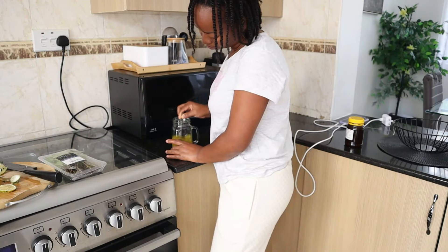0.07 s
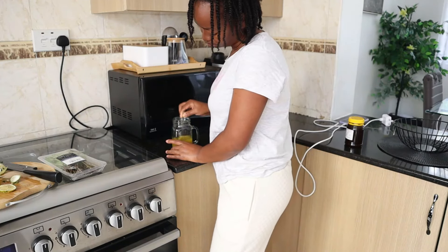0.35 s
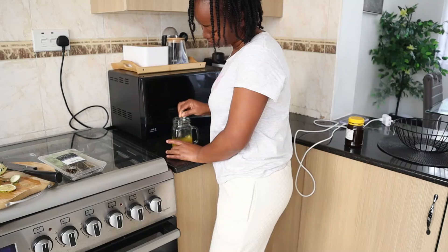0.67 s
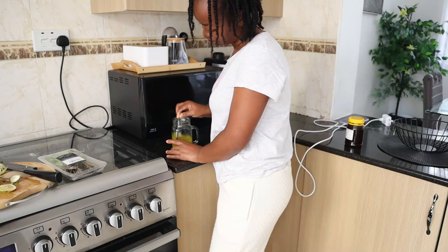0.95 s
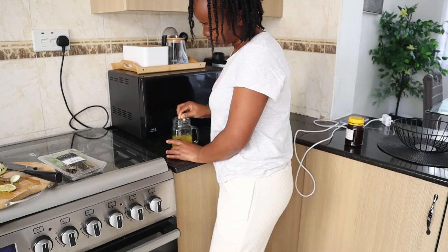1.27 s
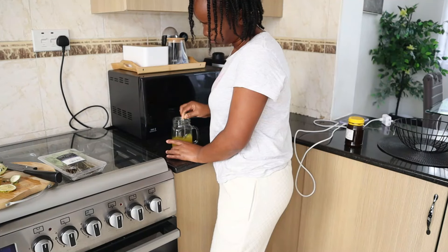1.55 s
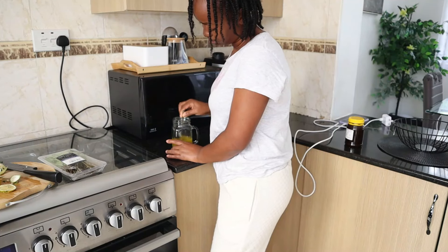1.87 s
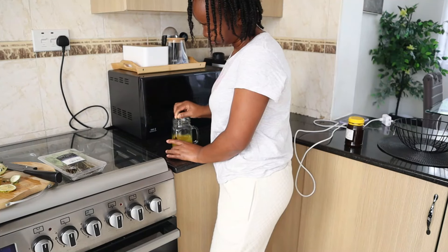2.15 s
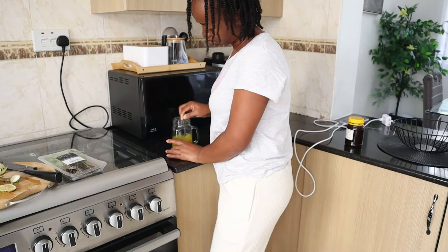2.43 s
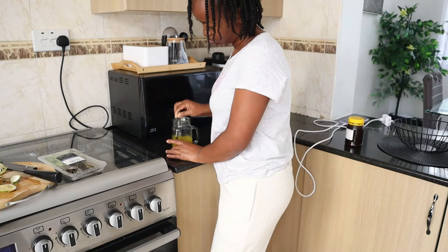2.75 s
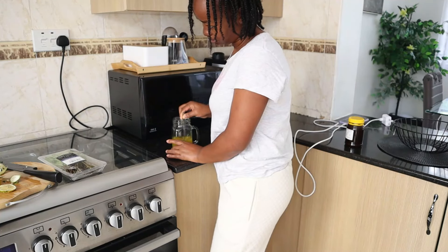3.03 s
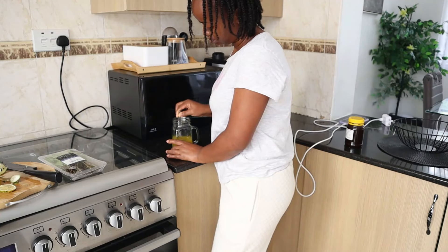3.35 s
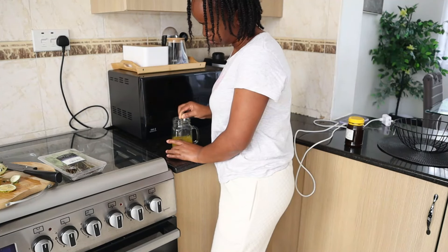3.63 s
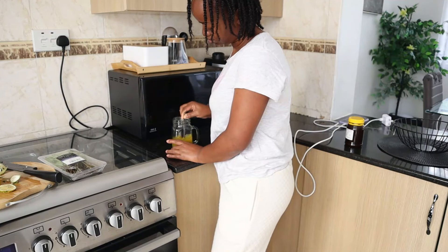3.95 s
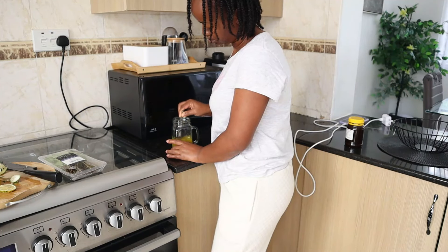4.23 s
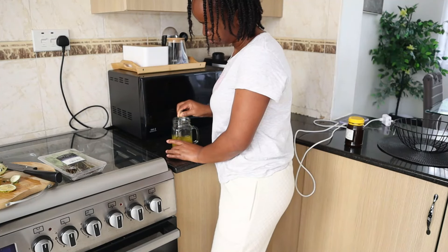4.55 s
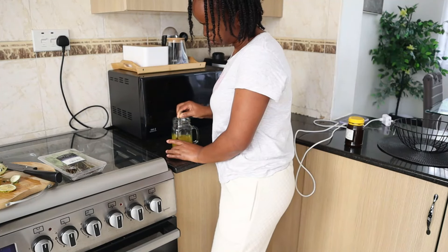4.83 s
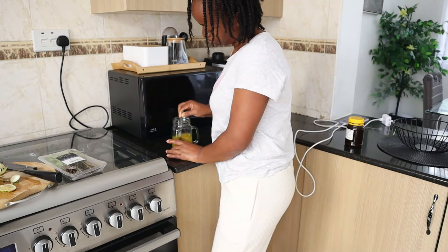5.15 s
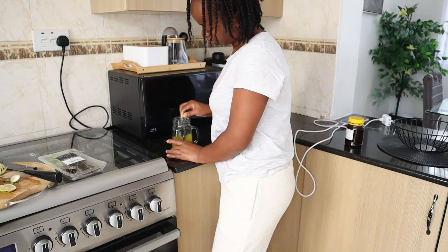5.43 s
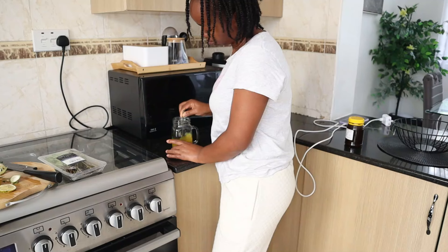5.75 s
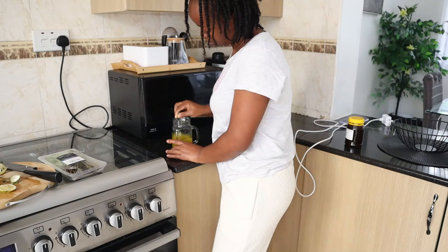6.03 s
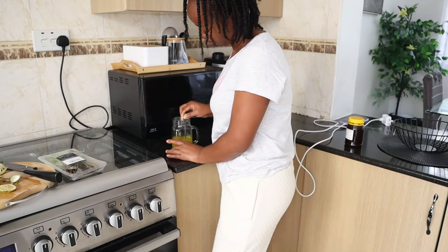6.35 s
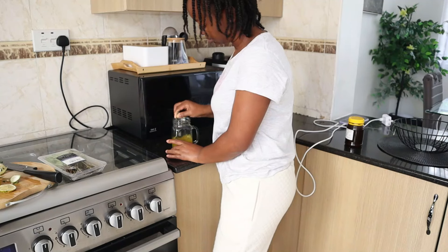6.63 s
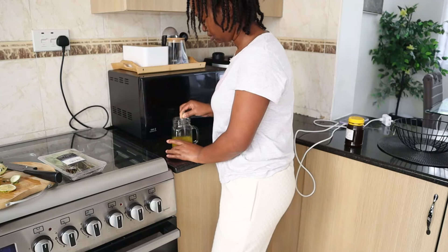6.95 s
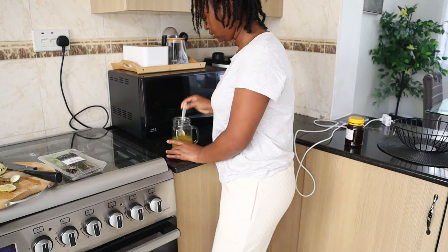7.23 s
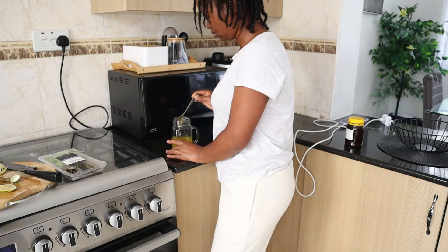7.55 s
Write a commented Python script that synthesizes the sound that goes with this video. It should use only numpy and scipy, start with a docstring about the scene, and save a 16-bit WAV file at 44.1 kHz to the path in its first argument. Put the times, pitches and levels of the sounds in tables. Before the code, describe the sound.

A steel teaspoon stirs a drink in a glass jar, heard from nearby in a slightly echoing kitchen. A soft liquid wash and a faint appliance hum run underneath. It opens with a hollow plop and a few clinks, then light scrapes and glancing touches, with more plops near 1.7 seconds. From about 2 to 3.5 seconds the spoon clinks quickly and unevenly, each bright, short ring carrying a small thud. A quieter stretch of rubbing and occasional light ticks follows, with dull knocks and plops at about 4.1 and 5.7 seconds. Stronger clinks return from 6.1 to 7.1 seconds, mixed with plops. At about 7.4 seconds the spoon taps the rim once with a clean, longer ring, and the liquid settles.

```python
"""A tiled kitchen: a steel teaspoon stirs a drink in a glass jar held on a stone counter.
The spoon clinks, rubs and glances along the glass, ringing modes damped by the drink and the hand.
The liquid washes round and plops, sounding the jar's hollow, and a few dull knocks come from the base.
At the end the spoon is lifted out and taps the rim. An appliance hums faintly throughout."""
import sys
import numpy as np
from scipy import signal
from scipy.fft import rfft, irfft, next_fast_len
from scipy.io import wavfile
from scipy.ndimage import map_coordinates

SR = 44100
rng = np.random.default_rng(int(sys.argv[2]) if len(sys.argv) > 2 else 0)


def transcribe(signal):
    """Save signal, clipped to [-1, 1], as a 16-bit WAV file at the path in sys.argv[1]."""
    frames = np.atleast_2d(signal).T
    limited = np.clip(frames, -1, 1)
    pcm = np.round(limited * 32767).astype(np.int16)
    wavfile.write(sys.argv[1], SR, pcm)


N = 343539

# modes of jar and spoon, damped by drink and hand: pitch_hz, level_db, base_t60_s
GLASS_MODES = [(2682, 8.5, 0.094), (2722, 9, 0.049), (2910, 8, 0.044), (3800, 4, 0.11), (4076, 12.5, 0.091),
               (3950, 11.5, 0.027), (4380, 13, 0.063), (4500, 9, 0.023), (5440, 2, 0.053), (6083, 8, 0.041),
               (6430, 5.5, 0.037), (7540, -9, 0.084), (8160, 2.5, 0.055), (8980, -19, 0.043),
               (10720, -0.5, 0.069), (12100, -10, 0.053), (11150, -23, 0.087)]


def amp(db):
    """Decibels to gain."""
    return 10 ** (np.asarray(db) / 20)


def unit(x):
    """x at rms 1."""
    return x / np.sqrt(np.mean(x ** 2) + 1e-20)


def along(points, hz):
    """Read a curve of (Hz, value) points on a log frequency axis."""
    freqs, values = np.transpose(points)
    return np.interp(np.log(hz + 1), np.log(freqs + 1), values)


def filtered(x, response):
    """EQ x with a gain given as a function of frequency."""
    n = x.shape[-1]
    padded = next_fast_len(n + 8192)
    return irfft(rfft(x, padded) * response(np.fft.rfftfreq(padded, 1 / SR)), padded)[..., :n]


def coloured(x, spectrum):
    """x shaped by (Hz, dB) points, at rms 1."""
    return unit(filtered(x, lambda hz: amp(along(spectrum, hz))))


def band(x, edges_hz):
    """Causal band-pass."""
    return signal.sosfilt(signal.butter(4, edges_hz, "bandpass", fs=SR, output="sos"), x)


def wobble(rate):
    """A smooth random curve, rate knots a second."""
    knots = rng.standard_normal(int(N * rate / SR) + 4)
    return map_coordinates(knots, [np.arange(N) * rate / SR])


def at_level(x, db, window_s):
    """A stereo event scaled so that the opening of its mono mix has this rms level."""
    opening = x.mean(0)[:round(SR * window_s)]
    return x * amp(db) / np.sqrt(np.mean(opening ** 2) + 1e-20)


def add(track, start_s, x):
    """Mix x into the track at start_s."""
    part = track[:, max(round(start_s * SR), 0):][:, :x.shape[1]]
    part += x[:, :part.shape[1]]


def event_time():
    """The time axis of one event, 0.55 s long."""
    return np.arange(SR * 11 // 20) / SR


def tone(hz, t60, attack_s=0.00052):
    """One damped note."""
    t = event_time()
    return np.sin(2 * np.pi * hz * t) * amp(-60 * t / t60) * (1 - np.exp(-t / attack_s))


def ringing(modes, sustain, scatter_db=4.5, detune=0.29):
    """Modes at new strengths for every blow, decays scaled by sustain; grip detunes the damped most."""
    t = event_time()
    hz, db, t60 = np.transpose(modes)[:, :, None]
    strength_db = db + scatter_db * rng.standard_normal(hz.shape)
    pitch_hz = hz + detune * rng.standard_normal(hz.shape) / t60 ** 1.5
    envelopes = amp(strength_db - 60 * t / (t60 * max(sustain, 0.2)))
    return np.sum(envelopes * np.sin(2 * np.pi * pitch_hz * t), 0)


def diffuse(n):
    """Stereo noise arriving from all sides: narrow in the bass, wide in the treble."""
    # stereo width: freq_hz, side_over_mid_db
    width = [(60, -18), (125, -15.5), (250, -2.5), (700, -5), (1300, -0.5), (2500, 4.5), (12000, 4)]
    mid, side = rng.standard_normal((2, n))
    side = filtered(side, lambda hz: amp(along(width, hz)))
    return np.array([mid + side, mid - side])


def kitchen(x, direct_db, near_db=-1, near_t60=0.058):
    """Direct sound, quick echoes off tiles and counter, then the room's tail."""
    # reverb time: freq_hz, t60_s
    room_decay = [(100, 1), (260, 0.49), (700, 0.57), (1800, 0.48), (4800, 0.49), (8000, 0.38),
                  (13000, 0.22)]
    t = event_time()
    noise = diffuse(len(t))
    hz, frame_s, spectra = signal.stft(noise, SR, nperseg=256)
    decay = amp(-60 * frame_s / along(room_decay, hz)[:, None])
    tail = signal.istft(spectra * decay, SR, nperseg=256)[1][:, :len(t)]
    tail *= 1 - np.exp(-t / 0.0048)
    near = noise[:, ::-1] * amp(-60 * t / near_t60)
    paths = (unit(tail) + amp(near_db) * unit(near)) / np.sqrt(len(t))
    paths[[0, 1], [0, 3]] += amp(direct_db)  # the right side arrives 3 samples late
    return signal.fftconvolve(x[None], paths, axes=1)[:, :len(t)]


def room_tone():
    """Still room air and an appliance's slightly unsteady hum."""
    # the appliance's note: pitch_hz, relative_db
    hum_notes = [(70.0, -50)]
    # colour of the air: freq_hz, gain_db
    air_eq = [(12, -13), (20, -10.5), (135, -0.5), (587, -9.5), (693, -10.5), (914, -12), (1640, -10.5),
              (2160, -18), (2620, -13.5), (3860, -21.5), (5380, -24.5), (11100, -38.5), (15000, -62)]
    t = np.arange(N) / SR
    hum = np.zeros(N)
    for hz, db in hum_notes:
        gain = np.sqrt(2) * amp(db - 9.5 + 1.1 * wobble(3))
        hum += gain * np.sin(2 * np.pi * hz * t + 0.5 * wobble(9))
    return hum + amp(-46) * coloured(diffuse(N), air_eq)


def swirl(wash_db=-53, lifted_s=7.3, settle_db_per_s=25):
    """The stirred drink washes round the jar, gently swelling, and settles once the spoon is lifted."""
    # colour of the wash: freq_hz, gain_db
    liquid_eq = [(250, -27), (420, -35), (700, 20.5), (900, -7), (1200, -10), (1650, 12), (2100, -61),
                 (2600, -16), (3200, -8), (3900, 5), (5500, -8.5), (9000, -13.5), (15000, -13.5)]
    wash = coloured(diffuse(N) * amp(1.1 * wobble(110)), liquid_eq)
    settling_db = settle_db_per_s * np.maximum(np.arange(N) / SR - lifted_s, 0)
    return wash * amp(wash_db - settling_db + 0.33 * wobble(4))


def wall_ring(blow, db, open_db, edge_db):
    """The wall rings into the room: an open wall gives more tone, a sharp edge more sparkle."""
    # low ring, high ring, sparkle and fizz: low_hz, high_hz
    registers = [(2200, 3300), (3400, 5200), (5200, 7500), (7500, 15000)]
    balance_db = open_db - 1.5, -3.7, edge_db - 5.5, edge_db - 5.5
    wet = kitchen(blow, direct_db=-53, near_db=2.5, near_t60=0.094)
    return sum(at_level(band(wet, edges), db + trim_db, window_s=0.027)
               for edges, trim_db in zip(registers, balance_db))


def singing(db, sustain):
    """A few modes sing on after a clean tap, louder when the grip is loose."""
    # lingering modes: pitch_hz, level_db, base_t60_s
    long_modes = [(1000, -16, 0.84), (2785, -10, 0.5), (3122, -3.5, 0.46), (3770, -12, 0.23),
                  (3920, -20, 0.2)]
    song = ringing(long_modes, sustain, scatter_db=-2.5, detune=0.96)
    return at_level(kitchen(song, direct_db=-20), db, window_s=0.076)


def jar_thud(db, skid, t60=0.015, hollow_hz=696):
    """Jar and counter thud, mostly by way of the room, and the air above the drink rings after them."""
    # body of jar and counter: freq_hz, gain_db
    thud_eq = [(60, -38), (130, 9), (195, -17.5), (260, -6.5), (400, -3.5), (445, 2.5), (520, -6.5),
               (900, -7.5), (1020, 0.5), (1170, 2.5), (1330, 2), (1490, -0.5), (1640, -3.5), (1900, -4),
               (2030, -13), (3000, -33)]
    t = event_time()
    thud = coloured(rng.standard_normal(len(t)), thud_eq) * (amp(-60 * t / t60) + skid)
    thud = kitchen(band(thud, (105, 2200)), direct_db=-10, near_db=-4, near_t60=0.39)
    hollow = kitchen(tone(hollow_hz, t60=0.11), direct_db=-8.5)
    return at_level(thud, db, window_s=0.077) + at_level(hollow, db - 9.5, window_s=0.11)


def dry_attack(x, peak_db, t60, edges_hz):
    """The front of a clink arrives straight from the jar, on the left first."""
    attack = band(x * amp(-60 * event_time() / t60), edges_hz)
    return amp(peak_db) * np.array([attack, np.roll(attack, 4)]) / np.abs(attack).max()


def clinks(crack_t60=0.026, skid_t60=0.16, clatter_db=1, clatter_t60=0.015):
    """Steel strikes glass: a brief blow and a short skid set jar and spoon ringing."""
    # spoon hits (open: how freely the wall rings; edge: how sharp the contact; low, high: spoon notes):
    # start_s, level_db, open_db, edge_db, low_hz, low_db, high_hz, high_db, thud_db, singing_db
    hits = [(0.003,-36,0.5,-13,2760,-42,4330,-38.5,-35.5,-42.5),
            (0.194,-28,-6.5,-4.5,2770,-46,3670,-36.5,-32,-58),
            (0.278,-44.5,1.5,-2,2700,-60,3870,-59,-43,-56), (1.363,-53,-3,3,2640,-62,4200,-57,-62,-72),
            (1.962,-36,-6.5,-10,2765,-41,4050,-47,-36,-68),
            (2.123,-36.5,-8,-11.5,2790,-50,4032,-45,-41.5,-54),
            (2.152,-28,-7.5,-8,2750,-51,4270,-45,-33,-54), (2.193,-34.5,-1,-0.5,2885,-46,4030,-46,-40,-40),
            (2.291,-36,1.5,-5,2720,-42,3650,-40,-36,-41),
            (2.302,-26.5,-3.5,-5.5,2744,-28.5,4053,-38,-30.5,-50),
            (2.408,-25.5,-2.5,-4,2450,-33,3480,-33,-27,-37.5),
            (2.699,-26,1.5,-7,2665,-34,4050,-33,-36.5,-43),
            (2.862,-36.5,-3.5,-5,2660,-36.5,3775,-36.5,-41,-47),
            (2.956,-28.5,-15,-9,2706,-41,3845,-34,-30.5,-41.5),
            (3.08,-27,-12,-8.5,2970,-37,4000,-37,-28.5,-30.5),
            (3.2,-30,-17,-9.5,2810,-35.5,3900,-42,-33.5,-39),
            (3.282,-30,0.5,0,2730,-43.5,3970,-42,-43,-37.5), (3.458,-40,-6,-6,2700,-48,3990,-41.5,-44,-58),
            (3.547,-29.5,-12,-1.5,2990,-45,4435,-34.5,-31.5,-35),
            (6.136,-22,-3,-7.5,2687,-22,3650,-32,-34,-55), (6.277,-29,-3,-8,2480,-36,4470,-45,-31.5,-44),
            (6.534,-34.5,1,-8,2720,-36,3960,-40,-39.5,-51), (6.549,-34.5,3,-7,2516,-29,4450,-46,-38,-52),
            (6.618,-29.5,-2,0.5,2734,-32,3920,-44,-41,-37.5),
            (6.871,-37.5,-1,5,3775,-30,3995,-32,-35.5,-47.5),
            (7.074,-24.5,-5,-3.5,2530,-30.5,3760,-33,-27.5,-37),
            (7.085,-28.5,-3,-16,2630,-40,3924,-19,-32,-27)]
    # colour of the contact noise: freq_hz, gain_db
    crack_eq = [(1500, -60), (2300, -19), (3200, -36), (4500, -16), (5500, -30), (8500, -6), (9800, -32),
                (12300, -11), (16000, -46)]
    # ranges of the brief notes that change with the point of contact: low_hz, high_hz
    clatter_ranges = [(2400, 3000), (3600, 4200), (3900, 4700), (5900, 9300)]
    out, t = np.zeros((2, N)), event_time()
    skid = amp(-11.5 - 60 * t / skid_t60)
    for start_s, db, open_db, edge_db, low_hz, low_db, high_hz, high_db, thud_db, singing_db in hits:
        sustain = 0.84 + 0.14 * open_db  # an open wall rings longer
        crack = coloured(rng.standard_normal(len(t)), crack_eq) * (amp(-60 * t / crack_t60) + skid)
        crack *= amp(-4.5 - 0.59 * open_db)  # and grates less
        clatter = [(hz, clatter_db, clatter_t60)
                   for edges in clatter_ranges for hz in rng.uniform(*edges, 3)]
        blow = ringing(GLASS_MODES + clatter, sustain) + crack
        clink = wall_ring(blow, db, open_db, edge_db)
        for hz, note_db in (low_hz, low_db), (high_hz, high_db):
            spoon_note = kitchen(tone(hz, t60=0.099), direct_db=2)
            clink += at_level(spoon_note, note_db, window_s=0.055)
        clink += singing(singing_db, sustain)
        clink += jar_thud(thud_db, skid)
        tick = dry_attack(crack, db + edge_db + 7.5, t60=0.017, edges_hz=(4500, 12500))
        strike = dry_attack(blow, db + open_db - 7, t60=0.054, edges_hz=(2300, 9000))
        add(out, start_s, clink + tick + strike)
    return out


def plops(glide=0.034, glide_s=0.013, wander=0.035, wander_hz=70, t60=0.15, attack_s=0.0019):
    """A gulp rings the air above the drink; the note wavers as the liquid churns, sinks as it falls."""
    # gulps: start_s, level_db, pitch_hz, churn_s
    gulps = [(0.015, -30, 742.5, 0.026), (1.671, -29.5, 738.5, 0.021), (1.757, -28.5, 729.5, 0.025),
             (1.838, -48, 714, 0.0082), (2.436, -23.5, 689, 0.0033), (2.448, -19, 675.3, 0.0018),
             (2.464, -23, 678, 0.0018), (4.098, -17.5, 690, 0.017), (4.815, -34.5, 696, 0.01),
             (4.968, -45, 1112, .004), (5.761, -24, 722.5, 0.016), (6.143, -25.5, 705, 0.048),
             (6.212, -25, 732, 0.035), (6.549, -36, 693, 0.015), (6.873, -37.5, 687, 0.024),
             (7.079, -22, 724, .025)]
    out, t = np.zeros((2, N)), event_time()
    for start_s, db, hz, churn_s in gulps:
        waver = unit(filtered(rng.standard_normal(len(t)), lambda f: f < wander_hz))
        bend = 0.988 + glide * np.exp(-t / glide_s) + wander * waver
        phase = 2 * np.pi * np.cumsum(hz * bend) / SR
        envelope = (1 - np.exp(-t / attack_s)) * amp(-60 * np.maximum(t - churn_s, 0) / t60)
        slosh = amp(-19) * unit(band(rng.standard_normal(len(t)), (640, 960)))
        wet = kitchen((np.sin(phase) + slosh) * envelope, direct_db=1, near_db=-3, near_t60=0.12)
        add(out, start_s - 0.002, at_level(wet, db, window_s=0.071))
    return out * amp([[1], [-1]])  # a little to the left


def knocks(t60=0.076, attack_s=0.0085):
    """Blunt blows on the base, damped by the hand and the counter."""
    # blows: start_s, relative_db
    blows = [(0.027, -34), (4.0939, -17), (5.711, -27), (5.7454, -11.5), (5.7614, -18.5), (5.7767, -31)]
    # body of the base: freq_hz, gain_db
    base_eq = [(80, -8), (130, -26), (280, -13.5), (420, -1.5), (550, -11.5), (720, 0.5), (950, -7),
               (1500, -4.5), (1900, -11), (2400, -17), (3200, -28.5), (6000, -36)]
    out, t = np.zeros((2, N)), event_time()
    envelope = amp(-60 * t / t60) * (1 - np.exp(-t / attack_s))
    for start_s, db in blows:
        thud = coloured(rng.standard_normal(len(t)), base_eq) * envelope
        wet = band(kitchen(thud, direct_db=-5.5), (80, 6000))
        add(out, start_s, at_level(wet, db - 9.5, window_s=0.097))
    return out


def rubbed_wall(slips, pitch_spread=0.024, scatter_db=4.7, grit_db=-28):
    """Slips excite the wall's resonances, which differ at each point of contact."""
    # wall resonances: centre_hz, width_hz, level_db
    resonances = [(1160,46,10), (1633,223,11.5), (2632,65,22), (3797,130,22), (4594,75,18.5), (6740,330,1),
                  (8070,180,7.5)]
    modes = [(hz * (1 + pitch_spread * rng.normal()), width, amp(db + scatter_db * rng.normal()))
             for hz, width, db in resonances]
    return filtered(slips, lambda f: amp(grit_db) + sum(
        gain * 1j * f * width / (hz * hz - f * f + 1j * f * width) for hz, width, gain in modes))


def rubs(slips_per_s=900, slip_spread_db=5):
    """The spoon drags along the glass in tiny, uneven slips that swell and fade."""
    # strokes: start_s, length_s, low_db, mid_db, hiss_db
    strokes = [(0.411,0.069,-50.5,-48.5,-53), (0.518,0.045,-45,-54,-54.5), (0.591,0.035,-49,-52,-56),
               (0.787,0.076,-47.5,-46.5,-51), (1.015,0.057,-51,-62,-71), (1.153,0.17,-53,-56.5,-56),
               (1.369,0.042,-62,-56,-56), (1.565,0.074,-51,-49,-49.5), (1.831,0.041,-55,-49,-65),
               (2.623,0.023,-42,-40,-50), (3.733,0.11,-54.5,-53.5,-52.5), (3.96,0.036,-50,-49,-53),
               (3.992,0.055,-42.5,-60,-45.5), (4.337,0.028,-47,-53,-58.5), (4.521,0.082,-51.5,-56,-52.5),
               (4.714,0.089,-48.5,-51,-54.5), (5.082,0.099,-53.5,-56,-60.5), (5.252,0.017,-46,-45.5,-48.5),
               (5.603,0.044,-48,-48.5,-45.5), (6.025,0.075,-55,-50,-56), (7.313,0.04,-62,-45,-52.5)]
    out, t = np.zeros((2, N)), event_time()
    for start_s, length_s, *levels_db in strokes:
        progress = np.minimum(t / length_s, 1)
        swell = np.sin(np.pi * progress ** 0.54)
        slips = swell * (rng.random(len(t)) < slips_per_s / SR) * rng.standard_normal(len(t))
        slips *= amp(slip_spread_db * rng.standard_normal(len(t)))
        # crossfade from one point of contact to the next
        rub = rubbed_wall(slips * (1 - progress)) + rubbed_wall(slips * progress)
        wet = kitchen(rub, direct_db=-7.5)
        for edges, db in zip([(600, 1860), (2000, 3180), (3200, 11600)], levels_db):
            add(out, start_s, at_level(band(wet, edges), db, window_s=length_s + 0.028))
    return out


def touches(t60=0.064, wall_db=-11):
    """A glancing touch under the liquid gives one short note and barely stirs the rest of the glass."""
    # glancing contacts: start_s, level_db, pitch_hz
    glances = [(0.446, -41.5, 2480), (0.598, -46.5, 3680), (0.779, -47, 2636), (0.992, -50, 3810),
               (1.6, -46.5, 3740), (4.922, -37, 2716), (5.256, -45, 3590), (5.608, -49.5, 2530),
               (5.612, -48.5, 4060)]
    out = np.zeros((2, N))
    for start_s, db, hz in glances:
        note = unit(tone(hz, t60)) + amp(wall_db) * unit(ringing(GLASS_MODES, sustain=0.4))
        add(out, start_s, at_level(kitchen(note, direct_db=-1.5), db, window_s=0.049))
    return out


def rim_tap(start_s=7.429, db=-20.5, click_db=-13, click_t60=0.014):
    """Out of the drink the spoon taps the rim once: a small click and a clean ring."""
    # free-ringing rim and spoon: pitch_hz, relative_db, t60_s
    rim_modes = [(996,-19,0.14), (2765,1.5,0.16), (2780,-15,0.17), (3128,-11,0.32), (3144,-9,0.62),
                 (3730,-12.5,0.23), (3830,-9,0.031), (4010,-18,0.15), (5770,-28.5,0.06), (8200,-39,0.063),
                 (8670,-30,0.034)]
    # colour of the click: freq_hz, gain_db
    click_eq = [(100,2), (300,8.5), (2000,-3), (3500,14.5), (5000,3), (13000,-16)]
    out, t = np.zeros((2, N)), event_time()
    for hz, mode_db, t60 in rim_modes:
        ring = kitchen(tone(hz, t60), direct_db=2)
        add(out, start_s, at_level(ring, db + mode_db, window_s=0.084))
    click = coloured(rng.standard_normal(len(t)), click_eq) * amp(-60 * t / click_t60)
    add(out, start_s, at_level(kitchen(click, direct_db=-19), db + click_db, window_s=0.059))
    return out


def scene():
    """Bright spoon hits over plops, knocks and rubs, on a bed of wash and room tone."""
    return clinks() + touches() + rim_tap() + plops() + knocks() + rubs() + swirl() + room_tone()


def record(dry, top_hz=15800):
    """The high treble is widened, dulls steeply above about 12 kHz and is cut off at top_hz."""
    # side and overall EQ: freq_hz, gain_db
    side_eq = [(400, 0), (1000, 1), (2500, -2), (5000, 0.5), (12000, 2.5)]
    rolloff = [(12200, -2.5), (13200, -15.5), (15500, -32)]
    mid, side = (dry[0] + dry[1]) / 2, (dry[0] - dry[1]) / 2
    side = filtered(side, lambda hz: amp(along(side_eq, hz)))
    pair = np.array([mid + side, mid - side])
    return filtered(pair, lambda hz: amp(along(rolloff, hz)) * (hz < top_hz))


dry = scene()
out = record(dry)
transcribe(out)
```